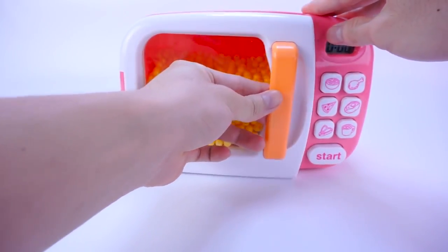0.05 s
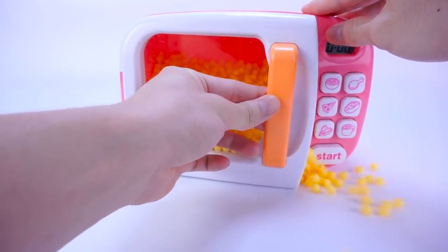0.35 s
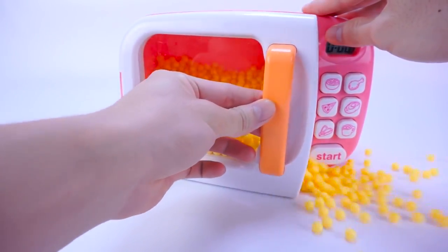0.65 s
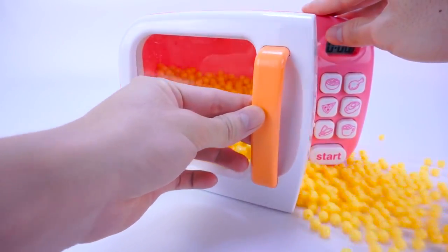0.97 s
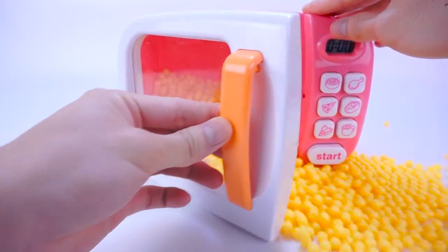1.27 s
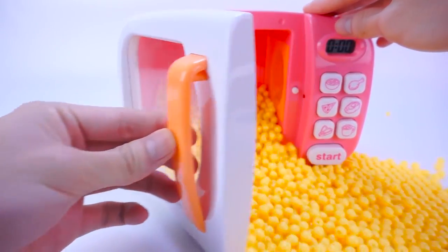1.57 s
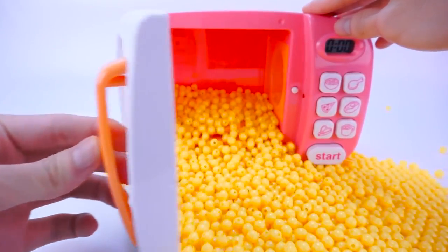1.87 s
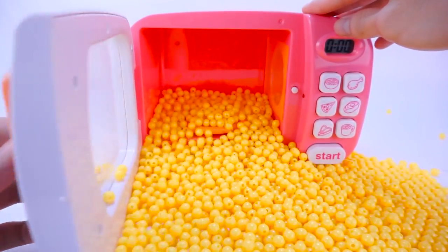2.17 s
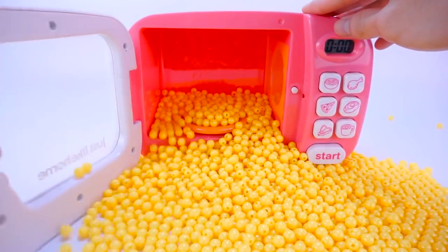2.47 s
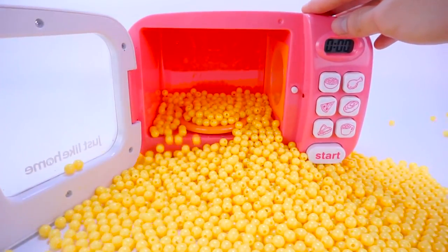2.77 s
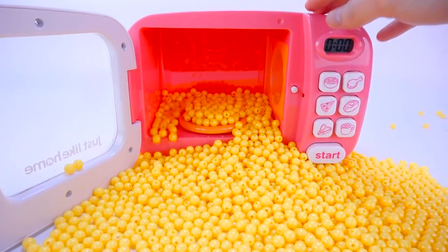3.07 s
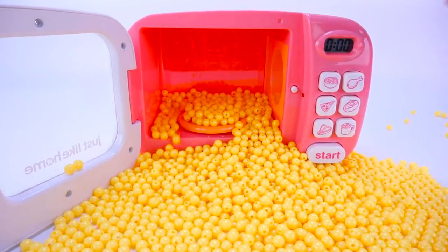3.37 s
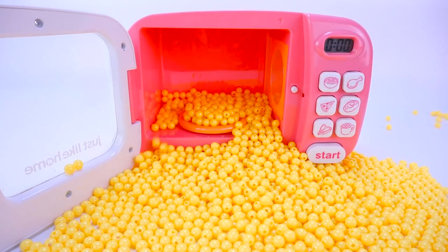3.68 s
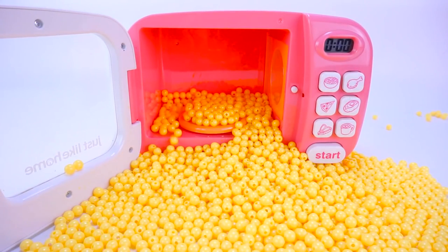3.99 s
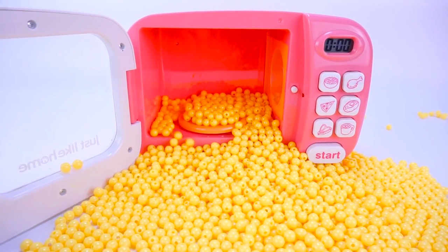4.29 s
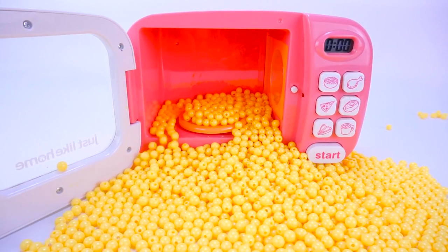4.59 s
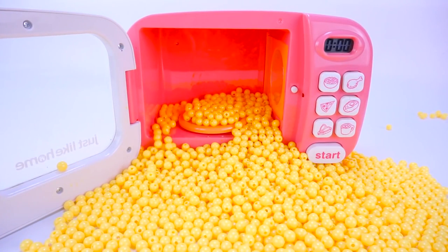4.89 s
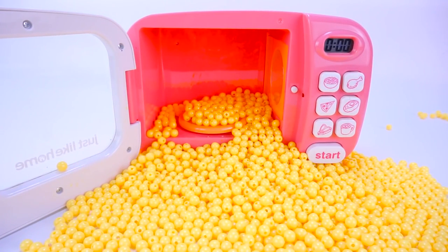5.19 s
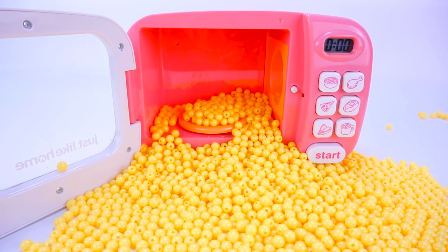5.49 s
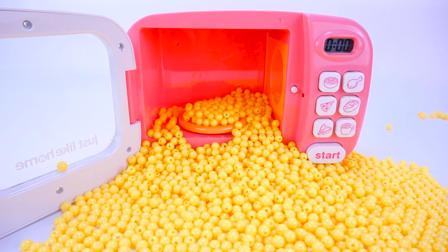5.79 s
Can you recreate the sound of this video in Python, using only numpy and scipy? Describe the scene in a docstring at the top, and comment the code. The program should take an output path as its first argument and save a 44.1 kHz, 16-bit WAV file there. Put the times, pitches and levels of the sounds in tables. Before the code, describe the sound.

Close up in a quiet room, a faint low bump and scattered ticks swell quickly into a dense rattle of small plastic beads spilling from a toy oven onto a hard tabletop. The stream dips briefly, surges again and patters onto the growing pile. It then drains to a lighter, uneven trickle, with single beads clicking against the hollow plastic and a few brief slides, all in stereo.

```python
"""A soft bump and a few ticks: a plastic toy oven's door opens and thousands of small beads pour out.
They rush through the gap on the right and bounce on a hard table, making the tabletop and door ring.
Then the growing heap muffles the table, and the beads left in the hollow oven trickle and drop one
by one, ringing its shell. Each hit is a tiny burst of noise with a few brief tones, shaped by what
the bead lands on. Heard close up, in stereo."""
import sys
import numpy as np
from scipy import signal
from scipy.fft import rfft, irfft
from scipy.io import wavfile
from scipy.ndimage import uniform_filter1d, map_coordinates

SR = 44100
rng = np.random.default_rng(int(sys.argv[2]) if len(sys.argv) > 2 else 0)


def output_pcm(signal):
    """Save a mono or channel-first signal as 16-bit PCM at the path in sys.argv[1].

    Samples are clipped to [-1, 1] before scaling.
    """
    pcm = np.clip(np.atleast_2d(signal).T, -1, 1) * 32767
    wavfile.write(sys.argv[1], SR, np.round(pcm).astype(np.int16))


N = 266628
TIME = np.arange(N) / SR

# Tone of the room's air: pitch_hz, gain_db
ROOM_TONE = [(25, -13), (140, 0), (600, 13), (2000, -12), (16000, -15)]
# Bass reaches both sides alike, treble does not: pitch_hz, side_minus_mid_db
STEREO_WIDTH = [(100, -39), (350, -17.5), (700, -11), (1300, -8), (2200, -5), (4000, -2), (8000, -2),
                (15000, 0)]
# Tone of a bead landing on the table, on other beads and in the oven: pitch_hz, gain_db
TABLE_TONE = [(80, -46), (200, -26.5), (285, -13.5), (490, -1.5), (690, -6), (780, 0), (1060, -5.5),
              (1300, 6.5), (1800, 0.5), (2550, 1.5), (3500, 1.5), (4600, 0), (7800, 0), (16000, -8)]
HEAP_TONE = [(70, -51), (140, -37), (250, -28.5), (350, -10), (540, -7), (1050, -7), (1650, -2.5),
             (2200, 1), (4300, 3.5), (7000, 0.5), (13000, -3), (16000, -11.5)]
OVEN_TONE = [(100, -40), (270, -41), (380, -15), (540, -9), (800, -2.5), (1100, -6.5), (1650, 0),
             (2200, 3.5), (4500, 6.5), (7000, 2.5), (13000, -6), (16000, -12)]
# Notes at which the oven's shell, the tabletop and the door ring: pitch_hz, width_hz, gain_db
SHELL_NOTES = [(358.5, 11.5, 1), (544, 39, 3), (710, 80, 1.5), (1966, 63, 1), (2667, 200, -6),
               (4630, 870, -11)]
TABLE_NOTES = [(762, 100, -1.5), (1440, 64, -1), (2580, 140, -2.5)]
DOOR_NOTES = [(2370, 150, -0.5), (2776, 130, -5), (3440, 220, 0)]
# Ringing, until the heap covers the table and the door swings clear: time_s, table_db, door_db
RING_LEVELS = [(.1, -65, -71), (.28, -46, -51), (.46, -30, -41), (.65, -51, -43), (1.0, -43, -34.5),
               (1.3, -46, -29.5), (1.55, -51, -28.5), (1.95, -60, -31.5), (2.25, -62, -33), (2.7, -70, -65)]
# Single beads that drop hard: start_s, level_db, extra_treble_db, extra_body_db
SINGLE_DROPS = [(0.089, -50, -3, 8), (0.0945, -44, 3, -18), (0.1306, -32.5, -7, -4),
                (0.1415, -29.5, -3, -11), (0.218, -26.5, 0.5, -11), (0.2535, -26, -3, -9),
                (0.302, -27, -4, -6), (0.3179, -22.5, -4, -7), (0.4115, -25, 0, -17), (2.7772, -32, 2, -14),
                (2.949, -20.5, -5, -11), (2.9961, -28, 8, -12), (3.027, -24.5, 3.5, -10),
                (3.0838, -24, 0, -10), (3.0989, -28.5, 4, -13), (3.138, -28, 3, -19),
                (3.1848, -29, -2, -1.5), (3.2016, -21.5, -5, -9), (3.2258, -21, -1.5, -9),
                (3.2704, -26, -1, -2.5), (3.3321, -23.5, -6, -10), (3.352, -24, -10, -12),
                (3.3742, -23.5, 2, -8), (3.3942, -25, -6, -22), (3.4186, -31, 6, -21),
                (3.4227, -27, 1, -13), (3.457, -43, 10, -13), (3.4796, -35, 2, -10), (3.534, -31, 6, -9),
                (3.5396, -22.5, 1, -8), (3.5667, -23.5, -1, -14), (3.6054, -21.5, -2.5, -13),
                (3.622, -21, -2, -10.5), (3.6508, -23.5, -1, -25), (3.6638, -24.5, 1, -7),
                (3.7144, -31, 5, -22), (3.7283, -27.5, 0, -4.5), (3.74, -27, -1, -8),
                (3.7506, -20.5, -4, -12), (3.8057, -27, 3, -26), (3.828, -24.5, 2, -9),
                (3.8463, -29, 0, -2), (3.9512, -31, 7.5, -1.5), (3.9624, -32, 5, -7),
                (4.0191, -22, 1.5, -12), (4.0495, -28, -1, -15), (4.0815, -21.5, -10, -29),
                (4.0893, -24, -8, -27), (4.1075, -24, 2, -30), (4.1624, -23.5, -1, -10.5),
                (4.2096, -25, -4, -16), (4.2365, -22, -2.5, -12), (4.273, -31, -1, -15),
                (4.3052, -24, 1, -3), (4.351, -25, 3, -8), (4.386, -34, 3, -8), (4.4107, -32, -5, -12),
                (4.419, -20.5, -4, -24), (4.4336, -30, -4, -15), (4.4604, -27, -3, -9),
                (4.4697, -24.5, 2, -18), (4.509, -23, 2, -27), (4.5228, -26, -3, -14),
                (4.5452, -22, -2, -27), (4.6074, -21.5, -8, -9), (4.6733, -22.5, -3, -9),
                (4.7532, -21.5, 0, -10), (4.8095, -22, 0, -7), (4.8703, -33, 9, -1), (4.8766, -31, 7, 2),
                (4.9549, -38, -8, -15), (5.099, -22.5, -2, -10), (5.122, -22, 1.5, -6.5),
                (5.1907, -34, 5, -18), (5.2089, -33, 5, -8), (5.2362, -25.5, -1, -12),
                (5.2547, -21.5, -2, -9), (5.2876, -39, -4, -14), (5.3675, -18.5, -4, -8),
                (5.4111, -31, -1, -11), (5.475, -22.5, 1.5, -10), (5.5019, -26, 3, -14),
                (5.5215, -29, -3, -21), (5.559, -30, 7, -17), (5.5957, -28.5, -12, 3),
                (5.6115, -29, 8, -10), (5.626, -25.5, 3, 0), (5.6613, -29.5, 0, -1), (5.6843, -22, -17, -7),
                (5.707, -22.5, -0.5, -6.5), (5.754, -30, 7, -2), (5.8041, -31, -5, -15),
                (5.8163, -31.5, -1, -5), (5.8766, -29, -6, -16), (5.895, -21, -0.5, -22),
                (5.9196, -22.5, 1, -8), (6.0278, -27.5, 2, -8)]
# The slope of beads left in the oven gives way in small slides: start_s, length_s, rise_db
BEAD_SLIDES = [(3.818, 0.027, 6.5), (4.01, 0.038, 3), (4.408, 0.11, 7), (4.818, 0.068, 6), (4.925, 0.2, 2),
               (5.45, 0.082, 4.5), (5.583, 0.054, 6), (5.788, 0.043, 2.5)]
# The stream swells, stalls in the gap, surges as the door swings wide and drains to a trickle:
# time_s, bead_click_db, panel_drum_db
STREAM_LEVELS = [(0.08, -63, -62), (0.15, -32, -36.5), (0.29, -23, -37), (0.33, -20.5, -34),
                 (0.42, -17.3, -31.5), (0.6, -17.5, -33), (0.79, -23, -35.5), (0.94, -19, -30),
                 (1.6, -18, -28), (2.05, -18, -32.5), (2.48, -19.5, -33.5), (2.65, -22, -34.5),
                 (2.95, -21.5, -32), (3.48, -29.5, -37), (3.95, -31, -36.5), (4.33, -33.5, -40.5),
                 (4.65, -25, -33.5), (5.3, -31, -36), (6.04, -28.5, -34.5)]
# How the beads land: time_s, hits_per_s, place (0 table, 1 heap, 2 oven), left_minus_right_db
LANDINGS = [(.2, 596, 0.82, -2), (.45, 4540, 0.04, -2.5), (.8, 3680, 0.44, -2.5), (1.4, 5500, 0.49, -3),
            (1.95, 5040, 0.74, -3), (2.7, 2190, 0.91, 0.5), (3.4, 850, 0.75, 0.5), (4.3, 596, 1.7, 0.5),
            (4.6, 1108, 1.49, 0.5), (6.05, 848, 1.24, .4)]


def gain(db):
    """Turn decibels into a number to multiply by."""
    return 10 ** (np.asarray(db) / 20)


def curves(table):
    """Join rows that start with a time by straight lines: one curve for each other column."""
    times, *columns = np.transpose(table)
    return [np.interp(TIME, times, column) for column in columns]


def unit(x):
    """Scale a sound to an average power of 1."""
    return x / np.sqrt(np.mean(x ** 2))


def pan(db):
    """Left and right gains; a positive db leans left."""
    return gain(np.array([db, -db]).reshape(2, -1) / 2)


def colour(x, points, size=2048):
    """Shape the tone along (pitch_hz, gain_db) points, with no ringing ahead of a hit."""
    hz, db = np.transpose(points)
    log_hz = np.log(np.fft.rfftfreq(size, 1 / SR) + 1)
    log_gain = np.log(gain(np.interp(log_hz, np.log(hz), db)))
    cepstrum = irfft(log_gain)[:size // 2]  # keep only the half that follows the hit
    cepstrum[1:] *= 2
    response = irfft(np.exp(rfft(cepstrum, size)))
    return signal.fftconvolve(x, response[None], axes=1)[:, :x.shape[1]]


def split(x, hz):
    """The parts of a sound below and above a pitch."""
    filters = [signal.butter(2, hz, kind, fs=SR, output="sos") for kind in ("low", "high")]
    return [signal.sosfilt(np.tile(sos, (2, 1)), x) for sos in filters]


def resonate(x, hz, width_hz):
    """Let a sound ring at one pitch; a narrower width rings longer."""
    return signal.lfilter(*signal.iirpeak(hz, hz / width_hz, SR), x)


def stereo(mid_side):
    """Make left and right from a shared part (mid) and a difference (side), narrow in the bass."""
    mid, side = mid_side[0], colour(mid_side[1:], STEREO_WIDTH)[0]
    return np.array([mid + side, mid - side])


def wander(rate_hz):
    """A smooth random wobble, about 1 in size."""
    return unit(signal.sosfilt(signal.butter(2, rate_hz, fs=SR, output="sos"), rng.standard_normal(N)))


def room_air(level_db=-62):
    """The faint, steady air of a small room."""
    return unit(colour(stereo(rng.standard_normal((2, N))), ROOM_TONE)) * gain(level_db)


def door_bump(start_s=0.099, push_s=0.022, gain_db=-47):
    """The latch lets go and the door panel gives a soft, low bump."""
    t = np.maximum(TIME - start_s, 0)
    swell = (t / push_s) ** 2 * np.exp(-t / push_s)
    return gain(gain_db) * swell * sum(np.sin(2 * np.pi * hz * t) for hz in (240, 285, 320))


def bead_click(snap_s=0.0078, rattle_s=0.048, tail_s=0.13, ping_s=0.036,
               rattle_db=-6, tail_db=-21, ping_db=-11):
    """One hit: a snap, a rattle of what it touches, plastic pings and a tail from nearby surfaces."""
    t = np.arange(3072) / SR
    stages = [(0, snap_s), (rattle_db, rattle_s), (tail_db, tail_s)]
    power = sum(gain(db - 60 * t / fade_s) ** 2 for db, fade_s in stages)  # each falls 60 dB in its time
    noise = rng.standard_normal((2, len(t))) * np.sqrt(power)
    ping_hz = np.exp(rng.uniform(np.log(1800), np.log(15000), (6, 1)))  # no two spots ring alike
    weight = np.sqrt(ping_hz / ping_hz.mean())  # high notes crowd together, so one ping stands for more
    pings = weight * np.sin(2 * np.pi * ping_hz * t) * gain(ping_db - 60 * t / ping_s)
    burst = noise + rng.choice([-1, 1], (2, len(pings))) @ pings
    return stereo(burst / np.sqrt(np.sum(burst ** 2)))


def oven_shell(hits, ring_db=0):
    """Hits plus the ring they raise in the oven's hollow walls, the same left and right."""
    ring = sum(gain(db) * resonate(hits.mean(0), hz, width_hz) for hz, width_hz, db in SHELL_NOTES)
    return hits + gain(ring_db) * ring


def plate_ring(hits, notes, drift=0.01454, swell_db=0.8, wander_hz=5):
    """As the beads' weight shifts on a plate, each of its notes drifts in pitch, swells and fades."""
    out = 0
    for hz, width_hz, db in notes:
        ring = resonate(resonate(hits, hz, 2 * width_hz), hz, width_hz)
        clock = np.cumsum(1 + drift * wander(wander_hz))  # an uneven clock bends the pitch
        clock -= uniform_filter1d(clock - np.arange(N), SR // 2)  # keep the ring in step with its hits
        bent = np.array([map_coordinates(side, [clock], order=1, mode="mirror") for side in ring])
        out = out + unit(bent) * gain(db + swell_db * wander(wander_hz))
    return unit(out)


def single_drops(gain_db=-0.3, body_trim_db=-3, scatter_db=1.0, heavy_db=-24):
    """Single beads strike the oven: a hard contact is bright, a square hit on a panel has more body."""
    out = np.zeros((2, N + SR))
    attack = int(0.008 * SR)  # the first 8 ms set each band's level
    for start_s, level_db, treble_db, body_db in SINGLE_DROPS:
        # A heavy drop rattles its neighbours; a light one is a bare tick.
        rattle_db = -6 + np.clip(level_db - heavy_db, -10, 0)
        strike = bead_click(snap_s=0.012, rattle_s=0.032, rattle_db=rattle_db, tail_db=-23, ping_db=-22)
        body, upper = split(colour(oven_shell(strike, ring_db=3.5), OVEN_TONE), hz=1360)
        middle, treble = split(upper, hz=8900)
        bands = [(body, body_db + body_trim_db), (middle, 0), (treble, treble_db)]
        drop = sum(band * gain(db) / np.std(band[:, :attack]) for band, db in bands)
        drop *= gain(level_db + gain_db) * pan(scatter_db * rng.standard_normal())
        start = int(start_s * SR)
        out[:, start:start + drop.shape[1]] += drop
    _, _, pan_db = curves(LANDINGS)
    return out[:, :N] * pan(pan_db)


def slide_rise_db(attack_s=0.0075, settle_s=0.021):
    """Extra level from small slides: each breaks loose quickly, runs for a while and settles."""
    rise_db = 0
    for start_s, length_s, db in BEAD_SLIDES:
        loosen = np.clip((TIME - start_s) / attack_s, 0, 1)
        settle = np.exp(-np.maximum(TIME - start_s - length_s, 0) / settle_s)
        rise_db += db * loosen * settle
    return rise_db


def bead_hits(hits_per_s, force_db=5, hardness_db=3.0, spread_db=4, spot_count=170):
    """Random hits, most soft and a few hard; a hard contact is short, so brighter as well as louder."""
    forces = np.linspace(-1, 2.2, spot_count)
    spots = []
    for force in forces:
        click = colour(bead_click(), [(3000, 0.0039), (12000, hardness_db * (force - 1))])
        spots.append(click * gain(force_db * force) * pan(spread_db * rng.uniform(-0.71, 1)))
    odds = np.exp(-forces ** 2 / 2)
    starts = np.flatnonzero(rng.random(N) < hits_per_s / SR)
    picks = rng.choice(spot_count, N, p=odds / odds.sum())[starts]
    signs = rng.choice([-1, 1], N)[starts]
    out = np.zeros((2, N + SR))
    for start, pick, sign in zip(starts, picks, signs):
        out[:, start:start + spots[pick].shape[1]] += sign * spots[pick]
    return out[:, :N] / np.sqrt(hits_per_s)  # same average power, however many hits


def bead_stream(slide_drum_share=0.5):
    """The rush of beads moves from the bare table, along the door, onto the heap and back into the oven."""
    click_db, drum_db = curves(STREAM_LEVELS)
    hits_per_s, place, pan_db = curves(LANDINGS)
    table_db, door_db = curves(RING_LEVELS)
    slide_db = slide_rise_db()
    hits = bead_hits(hits_per_s)
    on_table = colour(hits, TABLE_TONE)
    on_heap = colour(oven_shell(hits, ring_db=-3), HEAP_TONE)
    in_oven = colour(oven_shell(hits), OVEN_TONE)
    blend = sum(unit(surface) * np.maximum(1 - abs(place - k), 0)
                for k, surface in enumerate([on_table, on_heap, in_oven]))
    panels, beads = split(blend, hz=1830)  # the panels give the lows, the beads the highs
    # Sliding beads mostly hit each other, so the panels get only part of the rise.
    drumming = unit(panels) * gain(drum_db + slide_drum_share * slide_db)
    clicking = unit(beads) * gain(click_db + slide_db)
    table_ring = plate_ring(hits, TABLE_NOTES) * gain(table_db)
    door_ring = plate_ring(hits, DOOR_NOTES) * gain(door_db)
    return drumming + (clicking + table_ring + door_ring) * pan(pan_db)


def scene():
    """The door, the stream, the single drops and the room together."""
    return door_bump() + bead_stream() + single_drops() + room_air()


def record(dry):
    """Round off the tallest peaks and cut the treble above 16050 Hz."""
    treble_cut = signal.ellip(10, 0.2, 70, 16050, fs=SR, output="sos")
    return signal.sosfilt(treble_cut, np.tanh(dry))


dry = scene()
out = record(dry)
output_pcm(out)
```